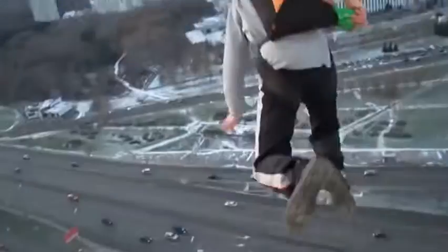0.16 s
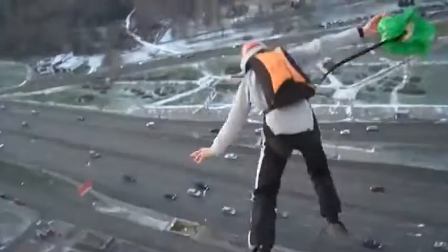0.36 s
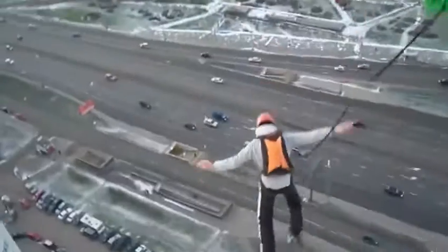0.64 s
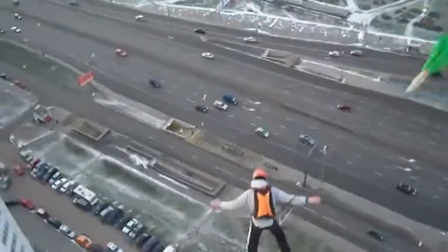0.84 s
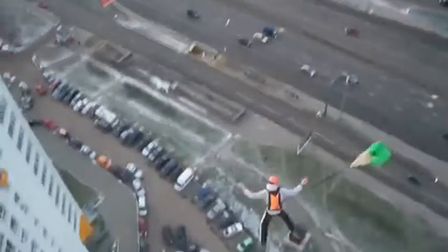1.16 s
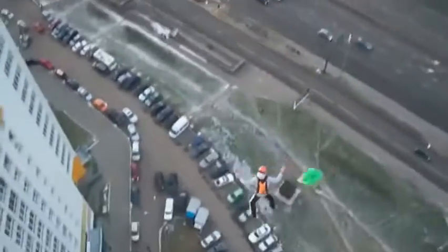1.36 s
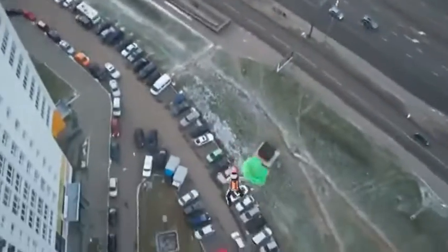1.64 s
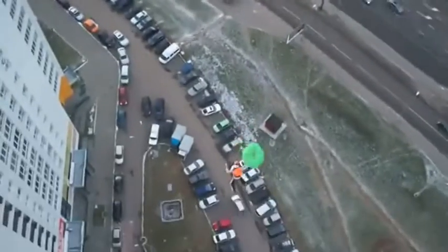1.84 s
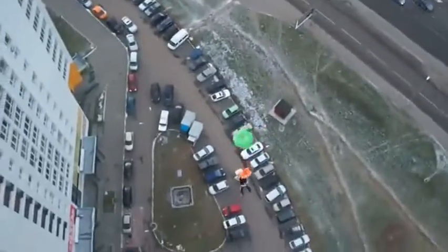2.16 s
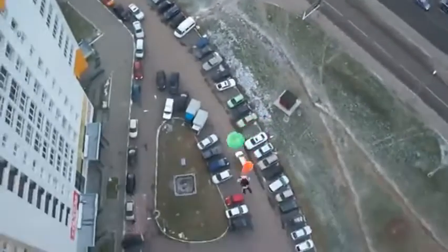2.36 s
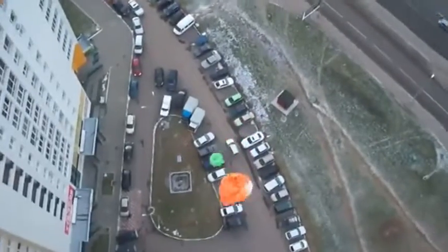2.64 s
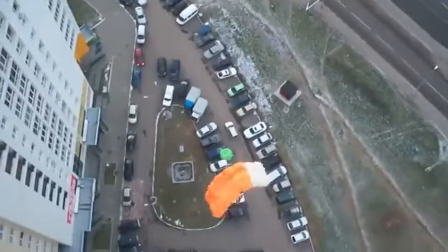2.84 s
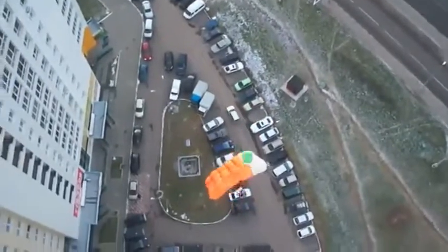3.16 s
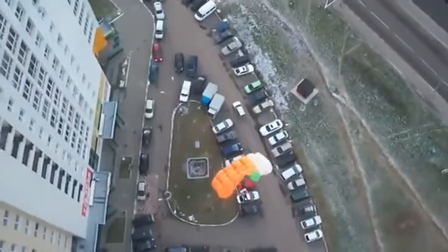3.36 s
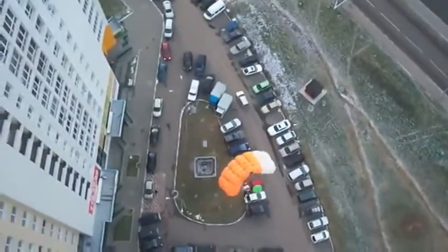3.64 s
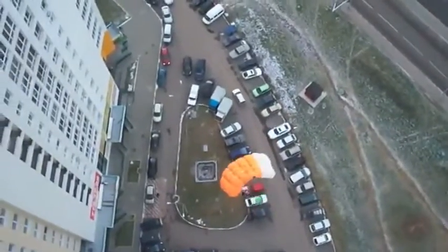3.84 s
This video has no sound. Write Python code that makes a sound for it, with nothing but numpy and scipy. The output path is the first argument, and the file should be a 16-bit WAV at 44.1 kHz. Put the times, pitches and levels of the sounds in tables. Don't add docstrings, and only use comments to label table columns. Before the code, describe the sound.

A parachute opens with sharp cloth snaps and a noisy rush, then flutters slackly; before it, railing clinks and nylon swishes close by, over steady far traffic and wind bumping a small camera microphone.

```python
import sys
import numpy as np
from scipy import signal
from scipy.fft import rfft, irfft, next_fast_len
from scipy.io import wavfile
from scipy.ndimage import uniform_filter1d, map_coordinates

SR = 44100
rng = np.random.default_rng(int(sys.argv[2]) if len(sys.argv) > 2 else 0)


def level_to_linear(level):
    exponent = np.asarray(level, float) / 20
    return 10 ** exponent


def wav_out(sig):
    wavfile.write(sys.argv[1], SR, np.round(np.clip(np.atleast_2d(sig).T, -1, 1) * 32767).astype(np.int16))


N = 176400


def unit(x):
    return x / np.sqrt(np.mean(x ** 2) + 1e-20)


def along(points, hz):
    f, level_db = np.transpose(points)
    return np.interp(np.log(hz + 1), np.log(f + 1), level_db)


def curve(rows, outside_db=None):
    s, level_db = np.transpose(rows)
    return np.interp(np.arange(N) / SR, s, level_db, outside_db, outside_db)


def wobble(rate):
    knots = rng.standard_normal(400)
    return map_coordinates(knots, [np.arange(N) * rate / SR])


def filtered(x, response):
    size = next_fast_len(len(x) + 8192)
    spectrum = rfft(x, size) * response(np.fft.rfftfreq(size, 1 / SR))
    return irfft(spectrum, size)[:len(x)]


def rush(spectrum, patchy_db):
    z = signal.stft(rng.standard_normal(N), nperseg=512)[2]
    patches = uniform_filter1d(rng.standard_normal(z.shape), size=6, axis=0)
    patches = uniform_filter1d(patches, size=12, axis=1)
    noise = signal.istft(z * level_to_linear(patchy_db * unit(patches)), nperseg=512)[1][:N]
    return unit(filtered(noise, lambda hz: level_to_linear(along(spectrum, hz))))


def band_unit(x, lo_hz, hi_hz):
    return x / np.std(filtered(x, lambda hz: (hz > lo_hz) & (hz < hi_hz)))


def add(track, s, sound):
    part = track[round(s * SR):][:len(sound)]
    part += sound[:len(part)]


# t/s, level/dB
CITY = [(0.0, -28), (0.15, -30), (0.33, -22.5), (1.79, -22.5), (1.96, -21), (2.24, -22.5), (2.31, -27.5),
        (2.36, -21.5), (2.75, -22), (2.81, -20.5), (2.89, -26.5), (2.95, -21.5), (3.03, -30.5),
        (3.22, -20.5), (3.45, -22.5), (3.6, -24)]
# f/Hz, level/dB (per Hz)
TRAFFIC = [(40, -6.5), (200, -4.5), (450, -3), (850, 1), (1600, -7.5), (2100, -16.5), (3500, -29),
           (6000, -36)]


def traffic():
    roar = band_unit(rush(TRAFFIC, patchy_db=1.5), 500, 1500)
    return level_to_linear(curve(CITY) + .6 * wobble(8)) * roar


# t/s, level/dB
WIND = [(0, -33.5), (.2, -27.5), (.45, -27.5), (.68, -27.5), (1.4, -31), (1.6, -24), (1.75, -28),
        (2.13, -25.5), (2.21, -22), (2.3, -28.5), (2.5, -27), (2.7, -23), (3.1, -25), (3.27, -23.5),
        (3.38, -30), (3.6, -24), (3.72, -16), (3.8, -16)]
# f/Hz, level/dB (per Hz)
BUFFET = [(8, -20), (24, -4), (45, -4), (90, -2), (200, -9), (400, -26), (1000, -53.5)]


def buffeting():
    gust_db, gusts_per_s = 1.5, 26
    gusts = level_to_linear(gust_db * wobble(gusts_per_s)) * rush(BUFFET, patchy_db=-1.0)
    return level_to_linear(curve(WIND) + 0.5) * unit(gusts)


# t/s (collapse), level/dB (peak), build-up/s, suction over peak
POPS = [(2.198, -16, .02, .8), (2.2165, -7, .005, .9), (2.2255, -1, .004, .6), (2.2495, -1, .004, -.2),
        (2.2585, -30, .004, 10), (2.263, -30, .004, 14), (2.275, -30, .004, 6), (2.642, -13, .006, .5),
        (2.65, -8, .003, .1), (3.247, -9, .012, .6), (3.2695, -11, .004, 1.3), (3.31, -15, .006, 1.2),
        (3.336, -15, .008, .6), (3.532, -14, .015, .9), (3.604, -10, .01, .8), (3.628, -20, .006, 3),
        (3.712, -4, .004, .3), (3.729, -4, .002, .8), (3.734, -4, .002, .6)]


def port_pops():
    collapse_s, recover_s, lead_s = .0011, .009, .1
    out, t = np.zeros(N), np.arange(8000) / SR - lead_s
    for s, db, build_s, suction in POPS:
        build = np.exp(-(t / build_s) ** 2 / 2)
        suck = -suction * np.exp(-np.abs(t) / recover_s)
        push = np.where(t < 0, build, suck)
        push = filtered(push, lambda f: np.exp(-(np.pi * f * collapse_s) ** 2 / 2))
        add(out, s - lead_s, level_to_linear(db) * push)
    return out


# t/s, level/dB
RUSTLE = [(0, -31.5), (.08, -38.5), (.18, -44), (.27, -41), (.5, -39.5), (.7, -46), (1.84, -44.5),
          (1.89, -53.5), (2.5, -54)]
# f/Hz, level/dB (per Hz)
NYLON = [(1500, -7), (3000, -1.5), (4500, -1), (5500, -7), (7000, -0.5)]


def rustle():
    cloth = band_unit(rush(NYLON, patchy_db=3.5), 3800, 7130)
    return level_to_linear(curve(RUSTLE, outside_db=-120) - 2.5 + 2.2 * wobble(14)) * cloth


# t/s, length/s, f/Hz (first pitch), f/Hz (last pitch), level/dB
SWISHES = [
    (.24, .05, 4700, 3900, -47),
    (.35, .09, 5450, 5600, -46),
    (.44, .065, 3700, 5700, -45),
    (.5, .05, 5200, 5100, -44),
    (.58, .06, 5500, 5300, -50),
    (.88, .06, 4800, 5300, -48),
    (1.31, .04, 5200, 5200, -50),
    (1.77, .08, 4700, 5300, -45),
]


def swishes():
    rough_hz, trim_db = 120, 1.5
    out = np.zeros(N)
    for s, length, first_hz, last_hz, db in SWISHES:
        stroke = np.arange(round(length * SR)) / (length * SR)
        fuzz = filtered(rng.standard_normal(8000), lambda f: 1 / (1 + (f / rough_hz) ** 2))
        fuzz = unit(fuzz[:len(stroke)])
        pitch_hz = first_hz + (last_hz - first_hz) * stroke
        tone = np.sin(2 * np.pi * np.cumsum(pitch_hz) / SR)
        add(out, s, level_to_linear(db + trim_db) * np.sin(np.pi * stroke) ** .5 * fuzz * tone)
    return out


# t/s, level/dB (peak), level/dB (bright modes)
CLINKS = [
    (.1110, -9, -24),
    (.1138, -5, -11),
    (.1245, -21, -19),
    (.1285, -20, -19),
    (.167, -29, -8),
    (.2995, -20.5, -11),
    (1.8218, -24, -19),
    (3.49, -32, -28),
]
# f/Hz, level/dB, t60/s
RAIL = [(2590, 0, .026), (2440, -15, .02), (2720, -12, .025), (2530, -33, .15)]
# f/Hz, level/dB, t60/s
RAIL_BRIGHT = [(6280, 7, .02), (5800, -5, 0.027), (5100, -9, .02)]


def rail():
    out, t = np.zeros(N), np.arange(5000) / SR

    def ring(modes):
        total = np.zeros(len(t))
        for hz, db, t60 in modes:
            decay = level_to_linear(db + rng.normal(0, .8) - 60 * t / t60)
            total += decay * np.sin(2 * np.pi * hz * t)
        return total

    for s, db, bright_db in CLINKS:
        clink = ring(RAIL) + level_to_linear(bright_db) * ring(RAIL_BRIGHT)
        onset = 1 - np.exp(-t / .0006)
        add(out, s, level_to_linear(db) * clink * onset)
    return out


# t/s, level/dB (peak), f/Hz
# (pitch), t60/s
SNAPS = [(0.114, -20.5, 4600, 0.057), (.1135, -14, 6380, .03), (.167, -27.5, 4100, 0.045),
         (0.3007, -21.5, 5220, 0.024), (0.358, -16.5, 4800, 0.016), (.358, -25, 7200, .01),
         (.553, -26, 6500, .08), (1.1394, -22, 4060, 0.01), (1.14, -17.5, 6560, .01),
         (1.206, -28, 6200, 0.017), (1.578, -27, 4200, .02), (1.794, -27.5, 4900, .02),
         (1.797, -13.5, 900, 0.025), (1.836, -29, 5300, .02), (1.813, -23, 6050, 0.011),
         (2.5365, -27, 3020, .04), (2.5511, -17.5, 3540, 0.035), (2.568, -26.5, 4200, .05),
         (2.62, -20.5, 3730, 0.04), (2.64, -20.5, 4130, 0.062), (2.655, -21, 4410, .04),
         (2.7, -16, 3980, 0.022), (2.701, -18.5, 6300, .02), (2.7381, -20, 5000, 0.045),
         (2.7792, -10.5, 5950, 0.025), (2.787, -11, 5240, 0.014), (2.796, -9.5, 5270, 0.014),
         (2.802, -9, 4520, 0.027), (2.8114, -11.5, 1400, 0.018), (2.813, -13, 4200, .015),
         (2.838, -12.5, 5500, .015), (2.8553, -8.5, 608, .04), (2.865, -15.5, 4550, .015),
         (2.873, -8.5, 5800, 0.021), (2.8948, -16, 5550, .012), (2.9122, -6.5, 5500, 0.014),
         (2.92, -7.5, 4550, 0.01), (2.934, -12, 4490, .025), (2.9469, -8, 4700, 0.011),
         (2.948, -15.5, 1510, .02), (2.9704, -17, 3400, 0.018), (2.981, -18, 4480, .012),
         (3.051, -24.5, 3660, 0.035), (3.119, -22, 4510, 0.043), (3.1765, -26.5, 5190, .015),
         (3.262, -13, 1500, 0.16), (3.396, -27, 4730, 0.014), (3.4313, -20.5, 3900, 0.049)]


def snaps():
    rise_s, width = .0003, .55
    out, t = np.zeros(N), np.arange(4000) / SR
    for s, db, hz, t60 in SNAPS:

        def resonance(f):
            damping = 1j * f * width * hz
            return (damping / (hz * hz - f * f + damping)) ** 2

        burst = rng.standard_normal(len(t)) * level_to_linear(-60 * t / t60) * (1 - np.exp(-t / rise_s))
        burst = filtered(burst, resonance)
        add(out, s, level_to_linear(db) * burst / np.abs(burst).max())
    return out


# t/s, level/dB
UNFOLD = [(2.5, -52), (2.56, -42), (2.68, -41), (2.75, -31), (2.805, -22), (2.885, -28.5), (2.925, -22.5),
          (2.97, -31), (3.04, -42)]
# f/Hz, level/dB (per Hz)
CLOTH = [(100, 2), (300, 17), (800, -2.5), (1700, 8.5), (2900, -7.5), (3600, -2), (4600, 3), (6300, -3.5)]
# t/s, level/dB
FLUTTER = [(2.98, -55.5), (3.03, -39.5), (3.1, -38), (3.2, -33.5), (3.27, -32.5), (3.34, -38),
           (3.42, -44.5), (3.5, -47.5)]
# f/Hz, level/dB (per Hz)
SLACK_CLOTH = [(100, -8.5), (400, 7.5), (1600, 13), (2400, 1), (3500, 4), (5000, -1), (6500, -8.5)]


def canopy():
    creases_per_s, spread_db, crease_t60, crease_share = 260, 7, .0038, .23
    sizes = level_to_linear(spread_db * np.minimum(rng.exponential(size=N), 2))
    kicks = (rng.random(N) < creases_per_s / SR) * sizes
    crease_power = signal.lfilter([1], [1, -level_to_linear(-120 / (crease_t60 * SR))], kicks ** 2)
    creases = unit(np.sqrt(np.abs(crease_power)))
    texture = np.sqrt(1 - crease_share + crease_share * creases ** 2) * level_to_linear(0.8 * wobble(40))
    out = np.zeros(N)
    for effort, colour in ((UNFOLD, CLOTH), (FLUTTER, SLACK_CLOTH)):
        cloth = band_unit(texture * rush(colour, patchy_db=0.5), 2500, 5400)
        out += level_to_linear(curve(effort, outside_db=-120)) * cloth
    return out


def scene():
    background = traffic() + buffeting() + port_pops()
    jumper = rustle() + swishes() + rail()
    parachute = snaps() + canopy()
    return (background + jumper + parachute)[None]


# f/Hz, level/dB
GUARD = [(5500, 0), (6500, -5.5), (7000, -14), (7500, -27.5), (7900, -57.5)]
# f/Hz, level/dB
TOP = [(14200, 1), (14300, -8.5), (14900, -49.5)]


def slow_converter(x):
    sample_hz, mirror_edge_hz = 16000, 8530
    x = filtered(x, lambda hz: level_to_linear(along(GUARD, hz)) * (hz < sample_hz / 2))

    def mirror_band(hz):
        straight_lines = (sample_hz / np.maximum(hz, 1) - 1) ** 2
        return straight_lines * (hz > mirror_edge_hz) * level_to_linear(along(TOP, hz))

    carrier = 2 * np.cos(2 * np.pi * sample_hz * np.arange(N) / SR)
    return x + filtered(x * carrier, mirror_band)


def band_limit(x):
    return signal.sosfilt(signal.butter(12, 15250, fs=SR, output="sos"), x)


def record(dry):
    ceiling, offset = .95, -.021
    fade_from_s, fade_to_s = 3.384, 3.807
    x = dry[0] / (1 + np.abs(dry[0] / ceiling) ** 4) ** .25
    x = slow_converter(x) + offset
    fade = np.clip((fade_to_s - np.arange(N) / SR) / (fade_to_s - fade_from_s), 0, 1)
    return band_limit((x * fade)[None])


dry = scene()
out = record(dry)
wav_out(out)
```